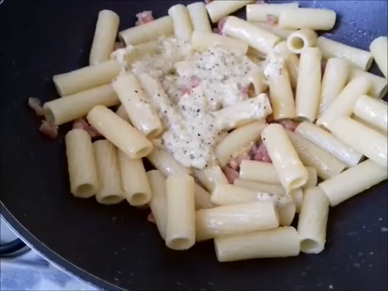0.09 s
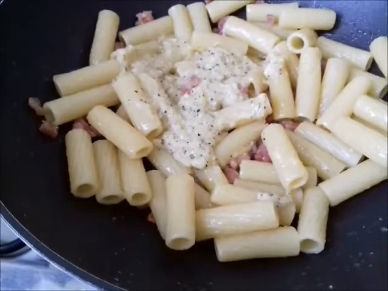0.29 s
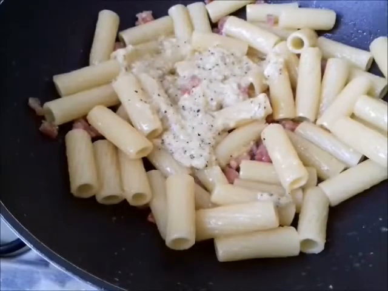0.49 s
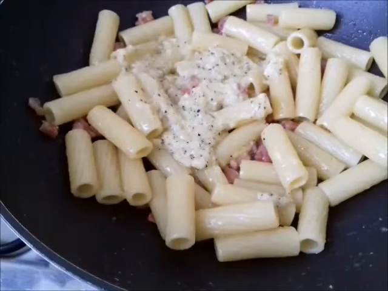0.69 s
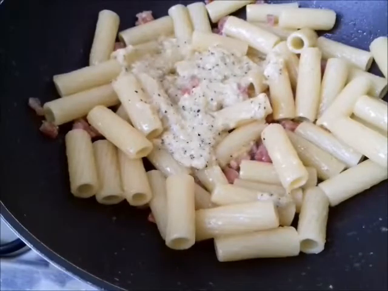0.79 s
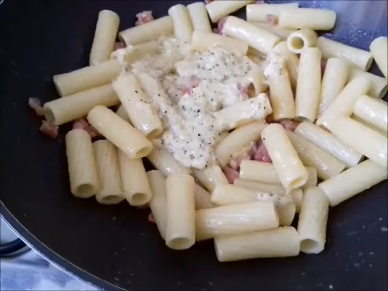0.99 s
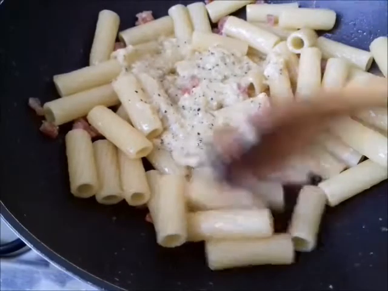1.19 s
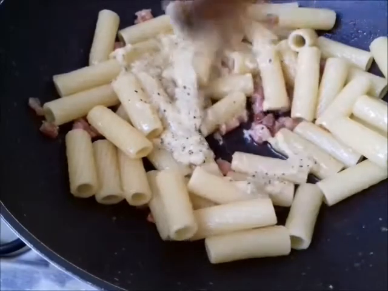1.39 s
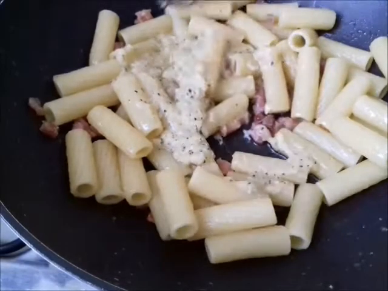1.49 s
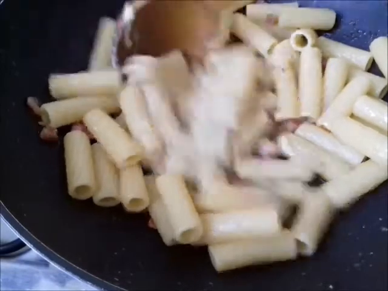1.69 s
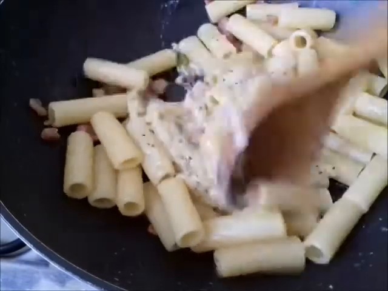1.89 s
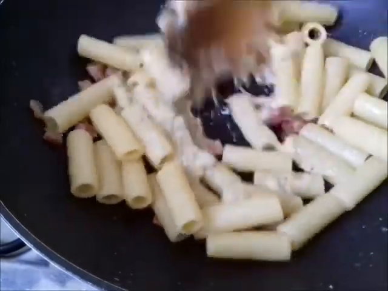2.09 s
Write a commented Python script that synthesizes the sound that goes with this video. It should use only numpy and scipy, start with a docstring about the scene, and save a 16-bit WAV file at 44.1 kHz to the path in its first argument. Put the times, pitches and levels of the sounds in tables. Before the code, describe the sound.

Loud hollow wooden clatter with a faint glass clink, then squelchy pasta stirring over gentle sizzle

```python
"""Wooden clatter over a pan of pasta

Something wooden is banged down and rattles: bursts of noise and tiny hits make a ringing wooden body sound.
A glass clinks with it as a few fading tones. Then a spoon ploughs through pasta: wet pops are short rings and
splashes, and one knock rings the pan. Under it, sizzle is noise and gliding tones; rumble is low noise.
"""
import sys
import numpy as np
from scipy import signal
from scipy.fft import rfft, irfft
from scipy.io import wavfile
from scipy.ndimage import uniform_filter1d

SR = 44100
rng = np.random.default_rng(int(sys.argv[2]) if len(sys.argv) > 2 else 0)


def master(y):
    """Save y as 16-bit WAV."""
    cut = np.clip(np.atleast_2d(y).T, -1, 1)
    pcm = np.round(cut * 32767)  # scale
    wavfile.write(sys.argv[1], SR, pcm.astype(np.int16))


N = 92610
T = np.arange(N) / SR  # time in seconds


def undb(db):
    """Turn decibels into an amplitude factor."""
    return 10 ** (np.asarray(db) / 20)


def level(x, db):
    """Scale a sound so its average (RMS) level is the given dB."""
    return x * undb(db) / np.sqrt(np.mean(x ** 2))


def curve(table, col):
    """Draw straight lines in time between the values of one table column."""
    points = np.array(table)
    return np.interp(T, points[:, 0], points[:, col])


def shape(table, hz):
    """Read a table of Hz and dB at any pitch; outside the table it is -90 dB."""
    points = np.array(table)
    return np.interp(np.log(np.maximum(hz, 1)), np.log(points[:, 0]), points[:, 1], -90, -90)


def colour(x, table):
    """Filter with a table of Hz and dB; the response never starts before its cause."""
    log_gain = shape(table, np.arange(4097) * SR / 8192) * np.log(10) / 20
    cepstrum = irfft(log_gain)
    # Folding the second half onto the first puts the energy as early as possible
    cepstrum[1:4096] *= 2
    cepstrum[4097:] = 0
    response = irfft(np.exp(rfft(cepstrum)))
    return signal.fftconvolve(x, response)[:len(x)]


def band(x, lo_hz, hi_hz):
    """Keep mainly the pitches between two limits."""
    return signal.sosfilt(signal.butter(2, [lo_hz, hi_hz], "band", fs=SR, output="sos"), x)


def add(out, s, hz, db, t60, glide=0.):
    """Add a tone from second s that fades by 60 dB in t60 seconds; glide makes its pitch rise."""
    i = int(s * SR)
    t = np.arange(min(int(t60 * SR) + 1, len(out) - i)) / SR
    phase = 2 * np.pi * hz * t * (1 + glide * t / t60)
    out[i:i + len(t)] += undb(db - 60 * t / t60) * np.sin(phase)


def walk(rate):
    """Smooth random wandering at about the given rate per second, with a spread near 1."""
    k = int(SR / rate)
    steps = np.repeat(rng.standard_normal(N // k + 1), k)
    return 1.3 * uniform_filter1d(uniform_filter1d(steps, k), k)[:N]


def room(x):
    """Kitchen echo: half-octave bands of noise that die away at their own rates."""
    # Each row: frequency in Hz, time to fade by 60 dB in seconds
    fade_times = np.array([(100, 0.44), (500, 0.32), (1500, 0.39), (4000, 0.44), (10000, 0.16)])
    t = T[:SR * 3 // 4]
    tail = np.zeros(len(t))
    for hz in 60 * 2 ** np.arange(0, 8, .5):
        t60 = np.interp(np.log(hz), np.log(fade_times[:, 0]), fade_times[:, 1])
        noise = band(rng.standard_normal(len(t)), hz / 2 ** .25, hz * 2 ** .25)
        tail += noise * undb(-60 * t / t60) / np.sqrt(t60)
    return signal.fftconvolve(x, tail / np.sqrt(np.sum(tail ** 2)))[:N]


def wood(x):
    """Wooden body: what strikes it sets off a broad click and many fading resonances."""
    # Broad colour of the click. Each row: frequency in Hz, relative level in dB
    click_colour = [(40, -50.5), (110, -30), (250, -12), (420, -18), (580, 1), (1020, -4), (1600, -9.5),
                    (2100, -20), (3200, -21), (4400, -32.5), (5700, -44), (9000, -71.5), (14000, -79.5)]
    # Resonances. Each row: frequency in Hz, width in Hz, level in dB before the width is allowed for
    resonances = [(540, 19, 8), (587.8, 11.3, 6), (780, 25, -2), (904, 18, -4.5), (930, 40, -9),
                  (1014, 28, 6), (1850, 10, -12), (1204, 16, 0), (1270, 27, 4), (1466, 40, 8),
                  (1514, 30, 6.5), (1730, 45, -1.5), (2590, 17, -15), (2790, 45, -18)]
    click = colour(signal.unit_impulse(8192), click_colour)
    ring = np.zeros(8192)
    for hz, width, db in resonances:
        # A narrower resonance rings for longer
        add(ring, 0, hz, db + 10 * np.log10(width), 2.28 / width)
    body = level(click, 0) + level(ring, 0)
    return signal.fftconvolve(x, body / np.sqrt(np.sum(body ** 2)))[:N]


def blows():
    """Each blow is a very short burst of noise that sets the wood ringing."""
    # Blows. Each row: start in seconds, strength in dB before the wood (22 dB is taken off below)
    blow_table = [(0.2052, 7), (0.217, 8), (0.231, 1), (0.2445, -2), (0.2715, 3.5), (0.278, 2),
                  (0.2965, -0.5), (0.314, -8), (0.3295, 4), (0.3655, -1), (0.378, -4), (0.396, -4.5),
                  (0.454, -21)]
    contact_s = .0008  # fade time of the contact noise
    drive = np.zeros(N)
    t = T[:SR // 100]
    for s, db in blow_table:
        i = int(s * SR)
        burst = np.exp(-t / contact_s) * rng.standard_normal(len(t))
        drive[i:i + len(t)] += level(burst, db - 22)
    return band(wood(drive), 530, 2440)


def rattling():
    """Thousands of tiny uneven hits a second drive the wood, with changing treble and boom."""
    # Rattling. Each row: time in seconds, level in dB, brightness change in dB, boom change in dB
    rattle_table = [(.19, -59, -10, -7), (.2, -31, -2, -7), (.206, -21.5, -0.5, -18.5),
                    (.25, -20, -1.5, -10), (.266, -26.5, 2.5, -6.5), (.274, -13, 1.5, -2),
                    (.316, -21, -0.5, -8.5), (.34, -16, 8, 8.5), (.355, -21, 1, -1), (.384, -14, -3, -2),
                    (.42, -25.5, 0.5, -2.5), (.47, -33.5, 9, 6)]
    hits_per_s, spread_db = 3000, 1
    struck = rng.random(N) < hits_per_s / SR
    hits = struck * rng.standard_normal(N) * undb(spread_db * rng.exponential(size=N))
    on = (T > rattle_table[0][0]) & (T < rattle_table[-1][0])
    rattle = wood(level(hits, 0) * on * undb(curve(rattle_table, 1)))
    bright = (undb(curve(rattle_table, 2)) - 1) * band(rattle, 2160, 11000)
    boom = (undb(curve(rattle_table, 3)) - 1) * band(rattle, 120, 573)
    return rattle + bright + boom


def earlier_knock():
    """The tail of a knock just before: noise through the wood, with extra boom, dying away."""
    start_db, t60_s, boom_db = -28, 0.34, 12.5
    tail = wood(rng.standard_normal(N))
    tail = tail + undb(boom_db) * band(tail, 200, 238)
    return tail * undb(start_db - 60 * T / t60_s)


def glass():
    """The glass rings once: fading tones that start a little weak and swell at first."""
    # Tones of the glass. Each row: frequency in Hz, starting level in dB before the swell, fade in seconds
    glass_tones = [(1832, -37, 1.15), (3880, -40, 0.2), (3985, -21, .3), (6750, -53, 0.5),
                   (6960, -36, 0.18), (8446, -57, 0.27), (10390, -48, .17)]
    clink_s, swell_s = .330, 0.013
    ring = np.zeros(N)
    for hz, db, t60 in glass_tones:
        add(ring, clink_s, hz, db, t60)
    return ring * (1 - 0.24 * np.exp(-np.maximum(T - clink_s, 0) / swell_s))


def clatter():
    """Blows and rattling echo in the kitchen; the earlier knock and the glass are added."""
    dry_wood = rattling() + blows()
    return dry_wood + undb(-8) * room(dry_wood) + earlier_knock() + glass()


def pops():
    """Bubbles between the pasta tubes burst: two short rings, a tiny crack and a brief splash."""
    # Wet pops of sauce and pasta. Each row: start in seconds, starting level in dB before filtering,
    # pitch in Hz, fade time in seconds, upper pitch in Hz, level of the upper pitch against the lower in dB
    pop_table = [(0.02, -34, 1330, 0.017, 2610, 5), (0.1165, -28.5, 2330, 0.012, 3330, -25),
                 (0.1324, -28.5, 1940, 0.0092, 2840, -6), (0.1352, -32, 2400, 0.016, 2950, -4),
                 (0.175, -31.5, 2700, 0.014, 3540, -1), (0.61, -38.5, 2760, 0.014, 3070, 4),
                 (0.7832, -35, 2050, 0.012, 3230, -13), (0.799, -52.5, 2880, 0.036, 3460, 14.5),
                 (0.902, -46, 1680, 0.041, 3220, 2), (0.9713, -26, 1750, 0.016, 2430, -0.5),
                 (1.0809, -35, 2600, 0.016, 3210, 2.5), (1.1295, -22, 2320, 0.0077, 3020, -19),
                 (1.1721, -34, 2360, 0.0079, 3140, -1), (1.1916, -23.5, 1664, 0.021, 3000, -20),
                 (1.2308, -30, 2500, 0.033, 2870, -2), (1.2504, -23, 2610, 0.028, 3200, -17),
                 (1.269, -26.5, 2790, 0.025, 2890, -1), (1.2769, -35.5, 2730, 0.017, 3100, 8.5),
                 (1.2834, -38, 2440, 0.013, 3100, 7), (1.3159, -35, 2580, 0.01, 2930, -8),
                 (1.3358, -38, 1720, 0.02, 3130, 1), (1.3659, -31, 2480, 0.011, 3150, 5),
                 (1.4003, -47, 2440, 0.011, 3080, -11), (1.4385, -38.5, 2650, 0.043, 3370, -1.5),
                 (1.482, -35, 2440, 0.017, 3120, -3), (1.4936, -41.5, 1850, 0.014, 2830, 7),
                 (1.505, -28, 2220, 0.0062, 3020, -15), (1.5547, -27.5, 2580, 0.022, 3080, -1),
                 (1.5836, -32.5, 2510, 0.027, 2960, -9), (1.5987, -18.5, 1590, 0.012, 2840, -32),
                 (1.6266, -27, 1640, 0.0079, 3300, -9), (1.6787, -27, 1730, 0.017, 3100, -13),
                 (1.7105, -29, 2140, 0.01, 3140, -3), (1.7477, -26.5, 1530, 0.02, 3370, -24),
                 (1.7522, -25.5, 2050, 0.0099, 2840, -7), (1.7686, -36, 1500, 0.013, 3240, 3),
                 (1.7883, -21, 1367, 0.017, 3540, -4.5), (1.8475, -49, 1790, 0.0088, 3300, 11.5),
                 (1.8652, -20.5, 2235, 0.016, 3320, -12), (1.9497, -42, 1850, 0.021, 3580, -11),
                 (1.984, -41.5, 1700, 0.036, 2470, 6.5), (2.024, -34, 2650, 0.0093, 3350, 3),
                 (2.0546, -34, 1620, 0.015, 3350, -8), (2.0794, -28, 2200, 0.0066, 3280, 7.5)]
    crack_db, splash_db, splash_t60_s = -42, -0.5, 0.033  # levels against the pop
    out = np.zeros(N)
    t = T[:SR // 10]
    for s, db, hz, t60, upper_hz, upper_db in pop_table:
        add(out, s, hz, db, t60)
        add(out, s, upper_hz, db + upper_db, t60)
        add(out, s, 2200, db + crack_db, .002)
        noise = band(rng.standard_normal(len(t)), 1510, 3170)
        splash = noise * undb(db + splash_db - 60 * t / splash_t60_s)
        i = int(s * SR)
        out[i:i + len(t)] += splash[:N - i]
    return band(out, 700, 6700)


def fat_spits():
    """Fat spits brightly: a very short high ring with an even shorter crack."""
    # Spits. Each row: start in seconds, starting level in dB before filtering, pitch in Hz
    spit_table = [(0.02, -38, 5670), (0.0715, -39, 7530), (0.204, -32.5, 5330), (0.2578, -39, 5100),
                  (0.422, -33, 5100), (0.596, -41.5, 5130), (0.797, -45, 4830), (0.9723, -35.5, 4670),
                  (1.2331, -32, 5600), (1.482, -43, 6450), (1.6294, -40, 4660), (1.7693, -27, 5700),
                  (2.078, -26.5, 4450)]
    t60_s, crack_db = 0.0052, -22.5
    out = np.zeros(N)
    for s, db, hz in spit_table:
        add(out, s, hz, db, t60_s)
        add(out, s, 7800, db + crack_db, .001)
    return band(out, 3200, 12000)


def spoon():
    """The spoon's edge knocks the pan: low pan tones ring under three short higher ones."""
    # Tones of the pan. Each row: frequency in Hz, relative level in dB, fade time in seconds (cut to 0.25)
    pan_tones = [(221, -1, 0.36), (426, 5, 0.15), (608, 3.5, 0.1), (750, 10, 0.055)]
    knock_s, knock_db = 1.605, -19
    out = np.zeros(N)
    for hz, db, t60 in pan_tones:
        add(out, knock_s, hz, knock_db - 25 + db, min(t60, .25))
    add(out, knock_s, 1150, knock_db - 0.5, .018)
    add(out, knock_s, 1900, knock_db - 4.0, .008)
    add(out, knock_s, 2700, knock_db, .008)
    return out


def bubble_grains():
    """Many tiny bubbles at random times: very short tones that glide upward."""
    grains_per_s, spread_db, cycles = 700, 3, 4
    grains = np.zeros(N)
    for when, pitch, strength in rng.random((int(grains_per_s * N / SR), 3)):
        hz = 1200 * 4 ** pitch
        add(grains, when * T[-1], hz, -spread_db * np.log(strength), cycles * 3 / hz, glide=0.54)
    return signal.lfilter([1, -.7], 1, grains)  # favours the treble


def sizzle():
    """Tiny bubbles over a flickering hiss, with a duller squelch of low noise under them."""
    # Sizzle and squelch. Each row: time in seconds, sizzle level in dB, squelch level in dB
    sizzle_levels = [(0, -48.5, -63.5), (.6, -52, -56), (.75, -51, -57.5), (.95, -50, -67),
                     (1.14, -46.5, -63), (1.185, -51, -62), (1.2, -40, -53), (1.29, -41.5, -62),
                     (1.32, -44.5, -58), (1.38, -43.5, -57.5), (1.42, -49.5, -59.5), (1.55, -50.5, -66),
                     (1.59, -50, -71), (1.61, -40, -48), (1.65, -44.5, -66), (1.7, -40.5, -44.5),
                     (1.735, -47.5, -54), (1.75, -44.5, -59), (1.8, -43, -57), (1.84, -47.5, -64),
                     (1.97, -47.5, -62), (2.0, -44, -70), (2.06, -42.5, -54), (2.1, -38.5, -55)]
    # Tone of the sizzle. Each row: frequency in Hz, relative level in dB
    sizzle_colour = [(400, -55), (700, -33.5), (1140, -4.5), (1600, -4), (2000, 1), (3000, -0.5),
                     (4300, -9), (5200, -17.5), (6500, -22), (9000, -32.5), (14000, -64.5)]
    # Treble of the sizzle. Each row: time in seconds, change in dB
    treble_levels = [(0, 1), (.8, 2), (1.0, 5), (1.15, 5.5), (1.2, -1), (1.6, -3), (1.8, 2.5), (2.1, 2.5)]
    hiss = rng.standard_normal(N) * undb(2.2 * walk(40))
    fizz = level(colour(level(bubble_grains(), -9.5) + hiss, sizzle_colour), 0)
    fizz = fizz + (undb(curve(treble_levels, 1)) - 1) * band(fizz, 4000, 5600)
    low_noise = band(band(rng.standard_normal(N), 500, 1300), 500, 1300)
    squelch = level(low_noise, 0) * undb(2.5 * walk(40))
    return fizz * undb(curve(sizzle_levels, 1)) + squelch * undb(curve(sizzle_levels, 2))


def low_rumble():
    """Low rumble of the kitchen and the pan: coloured noise that rises and falls."""
    # Loudness of the rumble. Each row: time in seconds, level in dB
    rumble_levels = [(0.5, -57.5), (0.624, -61), (0.936, -57.5), (1.092, -62.5), (1.118, -56.5),
                     (1.168, -59.5), (1.274, -63.5), (1.302, -60.5), (1.568, -64.5), (1.608, -47.5),
                     (1.916, -59), (2.1, -57.5)]
    # Tone of the rumble. Each row: frequency in Hz, relative level in dB
    rumble_colour = [(15, -40), (25, -16), (65, -20.5), (97, -9), (123, -18.5), (157, -8), (267, -9),
                     (317, -5), (454, -15.5), (600, -11), (780, -34), (1320, -120)]
    noise = level(colour(rng.standard_normal(N), rumble_colour), 0)
    return noise * undb(curve(rumble_levels, 1))


def scene():
    """Dull and thin the clatter, pops and knock, then add the rest equally to both channels."""
    near = pops() + spoon()
    front = clatter() + near + undb(-11.5) * room(near)
    # Soften the treble but let a little of the full sound through, then remove the bass
    dull = signal.sosfilt(signal.butter(3, 5200, fs=SR, output="sos"), front)
    front = dull + undb(-22.0) * front
    front = signal.sosfilt(signal.butter(4, 105, "high", fs=SR, output="sos"), front)
    mid = front + fat_spits() + sizzle() + low_rumble()
    return np.array([mid, mid])


def record(dry):
    """One microphone on both channels: rounded loud peaks, faint partly shared hiss, top cut off."""
    # Tone of the hiss. Each row: frequency in Hz, relative level in dB
    hiss_colour = [(3000, -26), (5000, 6.5), (7000, 11.5), (9000, 9), (10000, 3), (11000, 10.5),
                   (14000, 9.5), (15000, 0), (16000, 1.5)]
    # Tone of the noise that makes the channels differ. Each row: frequency in Hz, relative level in dB
    width_colour = [(18, -47.5), (30, -12), (103, -6.5), (382, -4.5), (1610, -12), (3010, -15), (4380, -14),
                    (5690, -22), (9640, -120)]
    hiss_db, width_db, squash, top_hz = -69.5, -71.5, 0.71, 15800
    shared = 0.46 * rng.standard_normal(N)
    hiss = np.array([level(colour(rng.standard_normal(N) + shared, hiss_colour), hiss_db) for _ in dry])
    # The width noise is upside down in the second channel
    side = level(colour(rng.standard_normal(N), width_colour), width_db) * np.array([[1], [-1]])
    rounded = np.tanh(squash * dry) / squash
    top_cut = signal.ellip(8, .2, 70, top_hz, fs=SR, output="sos")
    return signal.sosfilt(top_cut, rounded + hiss + side)


dry = scene()
out = record(dry)
master(out)
```